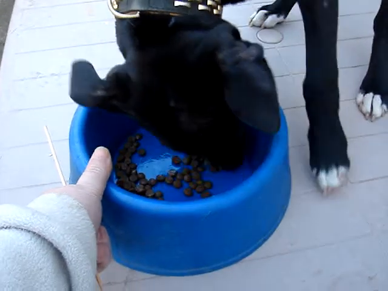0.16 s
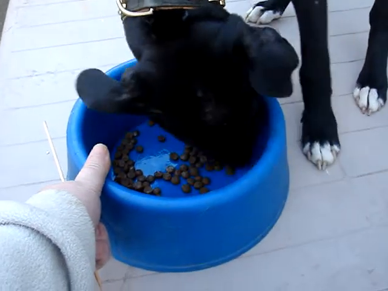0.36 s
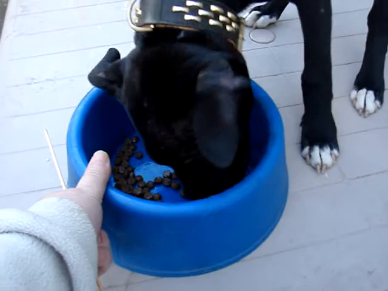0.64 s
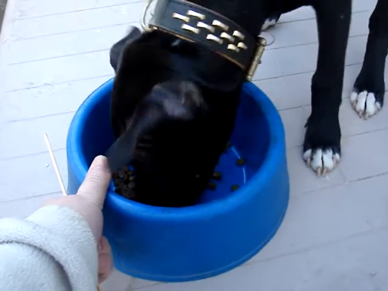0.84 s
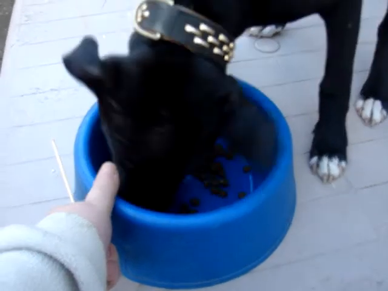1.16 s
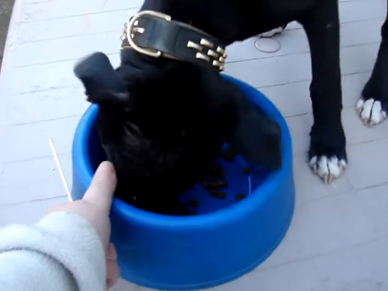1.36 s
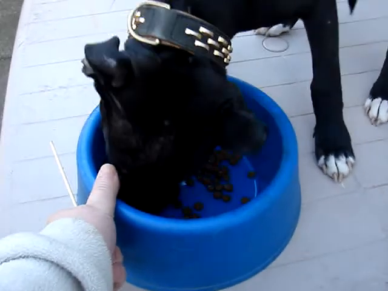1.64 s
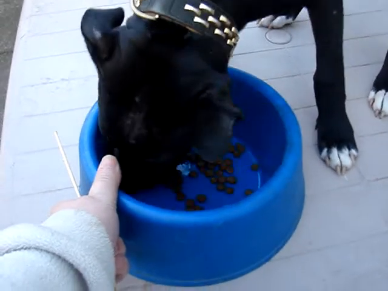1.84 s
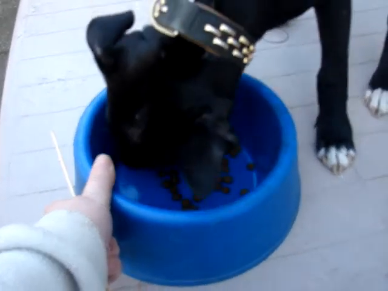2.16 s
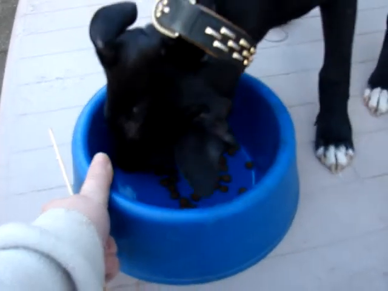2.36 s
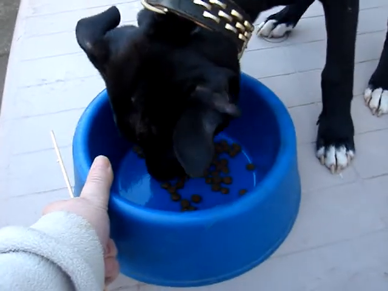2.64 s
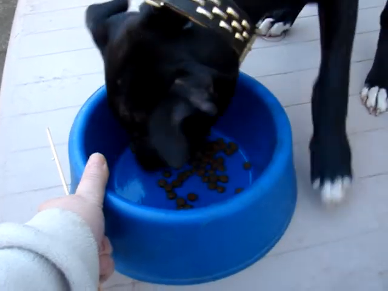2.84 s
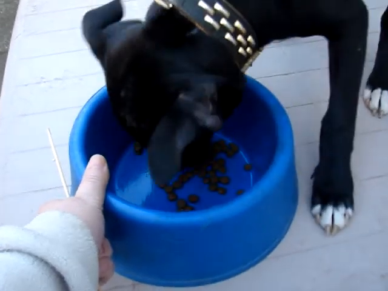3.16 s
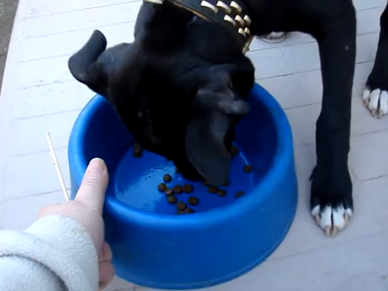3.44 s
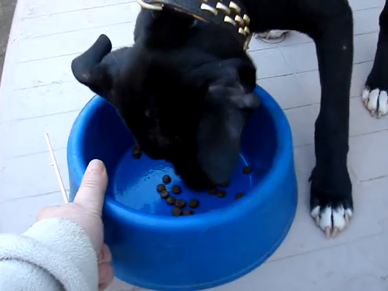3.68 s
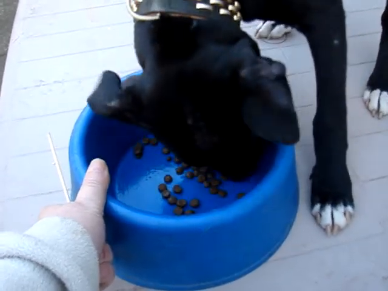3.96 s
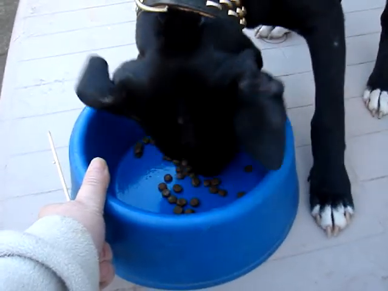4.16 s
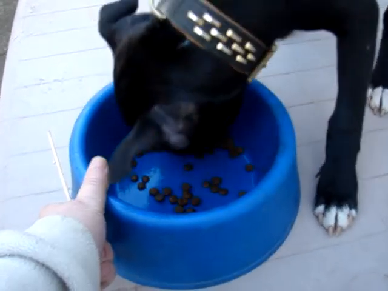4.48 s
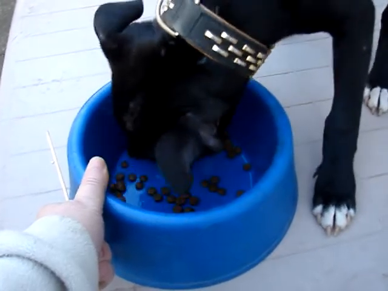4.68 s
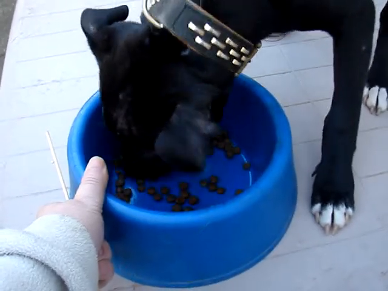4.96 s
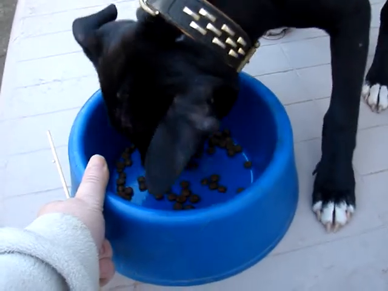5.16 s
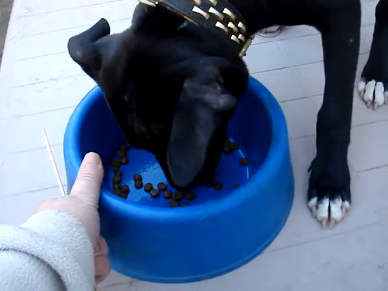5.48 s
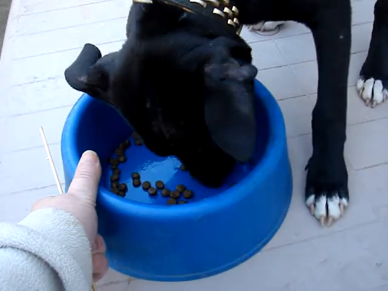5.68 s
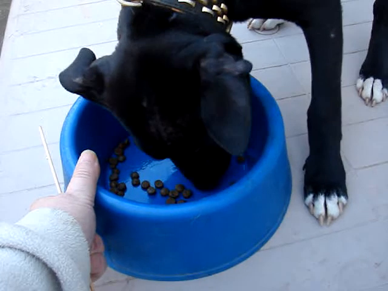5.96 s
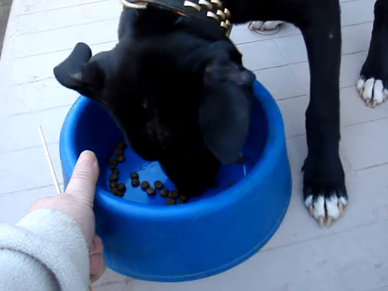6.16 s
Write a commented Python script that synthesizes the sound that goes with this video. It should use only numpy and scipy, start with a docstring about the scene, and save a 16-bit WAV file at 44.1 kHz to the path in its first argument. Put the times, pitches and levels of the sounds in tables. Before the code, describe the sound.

A large dog noses dry kibble around a plastic bowl up close, pellets rattling and cracking, the bowl thudding and dragging on boards.

```python
"""Large dog eating kibble

A large dog eats dry kibble, close by, from a plastic bowl on a board floor. Pellets crack, tick and rattle
as filtered impulses with short noise echoes and notes; crumbs grind and wet ticks cluster as lips part.
Teeth ring the hollow bowl's damped modes; the bowl thuds (brief cosine swings) and drags on the boards
(random slips through resonances). Faint reflections and quiet background noise surround it all."""
import sys
import numpy as np
from scipy import signal
from scipy.fft import rfft, irfft
from scipy.io import wavfile
from scipy.ndimage import uniform_filter1d

SR = 44100
rng = np.random.default_rng(int(sys.argv[2]) if len(sys.argv) > 2 else 0)


def put_to_file(sound):
    """Save the sound as 16-bit audio at rate SR, in the file named by the first command-line argument."""
    columns = np.atleast_2d(sound).T  # one column per channel
    safe = np.clip(columns, -1, 1)
    whole_steps = np.round(safe * 32767)
    wavfile.write(sys.argv[1], SR, whole_steps.astype(np.int16))


N = 278623
EDGE_HZ = 10100  # upper band limit

# colour of a pellet on plastic: f/Hz, level/dB
PELLET_SPECTRUM = [(60, -53), (250, -6), (480, -7), (700, 0.5), (950, -8.5), (1300, -6.5), (1780, -2),
                   (2220, -5.5), (2700, -2.5), (3500, -5), (4400, -6.5), (5300, -13.5), (7800, -21),
                   (10000, -36)]


def amp(db):
    """Decibels to gain."""
    return 10 ** (np.asarray(db) / 20)


def unit(x):
    """Scales a sound to rms 1."""
    return x / np.sqrt(np.mean(x ** 2) + 1e-20)


def curve(rows):
    """Level curve (t/s, level/dB) as a gain per sample."""
    return amp(np.interp(np.arange(N) / SR, *np.transpose(rows)))


def add(mix, start_s, sound):
    """Mixes a sound in at start_s."""
    part = mix[max(round(start_s * SR), 0):][:len(sound)]
    part += sound[:len(part)]


def colour(x, points, tilt_db=0, size=2048):
    """Minimum-phase filter with the given spectrum, its treble tilted by tilt_db per octave about 3 kHz."""
    hz = np.fft.rfftfreq(size, 1 / SR)
    point_hz, point_db = np.transpose(points)
    db = np.interp(np.log(hz + 1), np.log(point_hz), point_db)
    db = db + tilt_db * np.log2(np.clip(hz, 1200, EDGE_HZ) / 3000)
    # folding the cepstrum makes the response causal
    cepstrum = irfft(np.log(amp(db)))
    cepstrum[1:size // 2] *= 2
    cepstrum[size // 2 + 1:] = 0
    response = irfft(np.exp(rfft(cepstrum)))
    return signal.fftconvolve(x, response)[:len(x)]


def resonate(x, hz, width_hz):
    """A resonance of gain 1 at its centre."""
    return signal.lfilter(*signal.iirpeak(hz, hz / width_hz, fs=SR), x)


def glide(x, hz, width_hz):
    """A resonance that follows the curve hz: shift it to 0 Hz, low-pass, shift back."""
    turn = np.exp(2j * np.pi * np.cumsum(hz) / SR)
    r = np.exp(-np.pi * width_hz / SR)
    return 2 * (turn * signal.lfilter([1 - r], [1, -r], x / turn)).real


def shifting(x):
    """Random gain patches over time and frequency, so that resonances come and go."""
    z = signal.stft(x, nperseg=256)[2]
    patches = uniform_filter1d(rng.standard_normal(z.shape), size=3, axis=0)
    patches = uniform_filter1d(patches, size=12, axis=1)
    z = z * amp(2.4 * unit(patches))
    return signal.istft(z, nperseg=256)[1][:N]


def clumps(depth_db, size):
    """Bunching: a random gain that wanders over about size samples."""
    wander = uniform_filter1d(uniform_filter1d(rng.standard_normal(N), size), size)
    return amp(depth_db * unit(wander))


def steadied(x, size):
    """Evens out the power over size samples, so that only the quick texture is left."""
    return x / np.sqrt(uniform_filter1d(x ** 2, size) + .004 * np.mean(x ** 2))


def pushes(rows, attack_s, t60_s):
    """Gain of a series of pushes: each rises, holds for its length and dies away; their powers add."""
    t, power = np.arange(N) / SR, np.zeros(N)
    for start_s, length_s, db, *_ in rows:
        rise = np.clip((t - start_s) / attack_s, 0, 1)
        fall_db = -60 * np.clip((t - start_s - length_s) / t60_s, 0, 2)
        power += (rise * amp(db + fall_db)) ** 2
    return np.sqrt(power)


def pellet(points, tilt_db, scatter_db, scatter_t60_s, ring_db, ring_t60_s, note_db,
           low_hz=1600, high_hz=3900, width_hz=300, size=2048):
    """One hard contact: a snap, quick echoes between the bowl's walls, and a short ring of the plastic."""
    t = np.arange(size) / SR
    echoes, ring = rng.standard_normal((2, size))
    echoes *= amp(-60 * t / scatter_t60_s) * (1 - np.exp(-t / 0.00029))
    ring *= amp(-60 * t / ring_t60_s)
    hit = amp(scatter_db) * echoes / np.linalg.norm(echoes)
    hit += amp(ring_db) * ring / np.linalg.norm(ring)
    hit[0] += 1  # snap
    # every spot of the bowl favours two notes of its own
    notes_hz = low_hz * (high_hz / low_hz) ** rng.random(2)
    hit = hit + amp(note_db) * sum(resonate(hit, hz, width_hz) for hz in notes_hz)
    return colour(hit, points, tilt_db)


def background(level_db=-46):
    """Steady coloured noise whose spectrum shimmers in small patches."""
    # relative density: f/Hz, level/dB
    spectrum = [(20, 11.5), (100, -5), (300, 2), (700, -1), (1200, 1), (4300, -24), (10000, -25.5)]
    return amp(level_db) * unit(shifting(colour(rng.standard_normal(N), spectrum)))


def contacts(per_s=1100, spread_db=5.5, count=32):
    """Many small contacts of pellets rolling over each other, in bunches, at a steady power."""
    sizes = amp(spread_db * np.minimum(rng.exponential(1, N), 3)) * (rng.random(N) < per_s / SR)
    sizes *= rng.choice([-1, 1], N) * clumps(3, size=120)
    kind, grains = rng.integers(0, count, N), np.zeros(N)
    for k, tilt_db in enumerate(np.linspace(-7, 4, count)):
        grain = pellet(PELLET_SPECTRUM, tilt_db, scatter_db=0, scatter_t60_s=.008,
                       ring_db=-11, ring_t60_s=.022, note_db=-4)
        grains += signal.oaconvolve(sizes * (kind == k), unit(grain))[:N]
    return steadied(shifting(grains), size=650)


def munching(grains, level_db=-2, lumpy_db=4, mouth_hz=2300, wander_db=5.5, mouth_db=2,
             width_hz=350, tilt_db=-1):
    """Moist crumbs grind softly among ticking pellets; the mouth's resonance wanders as the jaw works."""
    # light rustle, before level_db: t/s, level/dB
    rustle = [(0, -43), (.35, -40.5), (.8, -37.5), (1.5, -37.5), (2.1, -38.5), (2.22, -42), (2.45, -36),
              (2.78, -47.5), (2.95, -38), (3.35, -46.5), (3.8, -49.5), (4, -37), (4.7, -31.5), (4.88, -37),
              (5.55, -41.5), (6.32, -44.5)]
    grind = colour(rng.standard_normal(N) * clumps(lumpy_db, size=160), PELLET_SPECTRUM, tilt_db)
    grind = unit(grind) + unit(grains)
    resonance_hz = mouth_hz * clumps(wander_db, size=3000)
    grind = grind + amp(mouth_db) * glide(grind, resonance_hz, width_hz)
    return amp(level_db) * steadied(shifting(grind), size=1200) * curve(rustle)


def drag(slips_per_s=600, lumpy_db=3, width_hz=110, rumble_db=-2, rumble_per_octave_db=-3,
         creep_db=-50, attack_s=0.0055, stop_t60_s=0.071):
    """The bowl's rim sticks and slips on the boards: each shove judders at its own pitch over a low rumble."""
    # the muzzle shoves the bowl: start t/s, length/s, level/dB, judder f/Hz
    shoves = [(0.197, 0.056, -34, 166), (0.334, 0.043, -37, 222), (0.605, 0.12, -33, 133),
              (0.824, 0.071, -37.5, 303), (1.003, 0.023, -35, 203), (1.198, 0.083, -32, 174),
              (1.35, 0.098, -25, 240), (1.471, 0.11, -32.5, 318), (1.65, 0.075, -35, 183),
              (1.861, 0.047, -26.5, 345), (1.949, 0.099, -33, 110), (2.091, 0.027, -33, 100),
              (2.279, 0.06, -29.5, 169), (2.36, .06, -32.5, 145), (2.48, 0.11, -46, 127),
              (2.688, 0.06, -37.5, 159), (2.806, 0.083, -32.5, 156), (2.941, .13, -31.5, 129),
              (3.298, 0.041, -25, 192), (3.375, 0.11, -34.5, 169), (3.492, .067, -32, 157),
              (3.917, 0.11, -38, 155), (4.283, .11, -41, 199), (4.491, 0.059, -37.5, 161),
              (4.744, 0.033, -25.5, 173), (4.876, 0.14, -34, 101), (5.059, 0.018, -24, 100),
              (5.14, 0.048, -26.5, 127), (5.222, 0.034, -35.5, 89.5), (5.34, 0.021, -35.5, 133),
              (5.734, 0.074, -38.5, 335.5), (5.999, 0.13, -37.5, 300)]
    # colour of the rumble: f/Hz, level/dB
    spectrum = [(10, -35), (35, 3), (90, 8), (230, -0.5), (400, -5), (900, -30), (2000, -41)]
    slips = rng.standard_normal(N) * (rng.random(N) < slips_per_s / SR) * clumps(lumpy_db, size=500)
    rumble = steadied(colour(slips, spectrum, size=8192), size=1100)
    out = amp(creep_db) * rumble  # it barely creeps between shoves
    for start_s, length_s, db, hz in shoves:
        span = slice(max(int(start_s * SR), 0), int((start_s + length_s + stop_t60_s) * SR))
        judder = resonate(resonate(slips, hz, width_hz), hz, width_hz)
        judder = unit(judder[span])
        judder = judder + amp(rumble_db + rumble_per_octave_db * np.log2(hz / 170)) * rumble[span]
        gain = pushes([(start_s, length_s, db)], attack_s, stop_t60_s)
        out[span] += steadied(judder, size=1100) * gain[span]
    return out


def rattle(grains, level_db=-2, note_db=-1, width_hz=350, treble_db=0.6, treble_per_octave_db=1.5,
           attack_s=0.0019, settle_t60_s=0.13):
    """Each muzzle sweep sets pellets rattling, coloured by the gap around it; then they roll to rest."""
    # sweeps, before level_db: start t/s, length/s, level/dB, gap resonance f/Hz
    sweeps = [(0.048, 0.046, -32, 1900), (.255, 0.0082, -35, 1850), (0.423, 0.022, -33, 1980),
              (0.566, 0.067, -29, 1740), (0.711, 0.039, -31.5, 2670), (0.789, 0.031, -34.5, 1300),
              (0.895, 0.052, -24.5, 1790), (0.995, 0.046, -30, 1890), (1.172, .02, -33, 1890),
              (1.229, .04, -23, 2130), (1.307, 0.032, -25.5, 1900), (1.424, 0.028, -24.5, 1990),
              (1.467, 0.054, -21.5, 2680), (1.543, 0.021, -22.5, 2500), (1.651, 0.063, -32.5, 1850),
              (1.779, 0.057, -29, 1940), (1.917, 0.066, -33, 2630), (2.037, 0.11, -34, 2050),
              (2.26, 0.012, -30, 2090), (2.637, .05, -34.5, 1850), (3.93, 0.078, -42, 2880),
              (4.006, 0.024, -31, 1850), (4.18, 0.022, -30, 2480), (4.295, 0.05, -28, 2700),
              (4.39, 0.054, -27.5, 2650), (4.516, 0.02, -26.5, 1760), (4.547, .06, -25, 2800),
              (4.656, 0.086, -27, 1760), (4.784, .03, -32.5, 1940), (4.927, 0.038, -27, 2870),
              (5.016, 0.028, -22.5, 1630), (5.53, .11, -36.5, 2500), (6.028, .11, -36.5, 1780)]
    out = np.zeros(N)
    for start_s, length_s, db, hz in sweeps:
        span = slice(max(int(start_s * SR), 0), int((start_s + length_s + settle_t60_s) * SR))
        # a narrower gap rings higher and lets more treble through
        tilt_db = treble_db + treble_per_octave_db * np.log2(hz / 2000)
        heap = colour(grains[span], [(1, 0), (EDGE_HZ, 0)], tilt_db)
        heap = unit(heap + amp(note_db) * resonate(heap, hz, width_hz))
        gain = pushes([(start_s, length_s, db + level_db)], attack_s, settle_t60_s)
        out[span] += heap * gain[span]
    return out


def clicks(level_db=-9.0, rebound_db=-17, rebound_s=0.011, note_db=1, width_hz=420, size=176):
    """Single loud pellet cracks and strikes, short and dry, each with its note and a faint rebound."""
    # cracks and strikes, before level_db: t/s, level/dB, note f/Hz
    strikes = [(0.052, -17, 1780), (0.5778, -10.5, 1820), (0.6184, -14, 2070), (0.7069, -7, 3100),
               (0.8867, -16, 1740), (0.9068, -10.5, 1900), (0.9662, -18.5, 1710), (0.9963, -15, 2500),
               (1.1526, -15, 2650), (1.1875, -9, 1900), (1.236, -13.5, 2760), (1.2569, -14, 2180),
               (1.2724, -15, 2150), (1.3025, -2, 3460), (1.316, -11, 3070), (1.323, -6.5, 1830),
               (1.3324, -5.5, 1900), (1.3813, -13.5, 1690), (1.4597, -11.5, 2500), (1.4817, -13, 3600),
               (1.497, -8, 2670), (1.517, -6.5, 1790), (1.5518, -2.5, 2640), (1.5587, -12, 2090),
               (1.6223, -16.5, 1880), (1.6618, -8, 2500), (1.7045, -14, 2420), (1.8003, -12.5, 2750),
               (1.9296, -9, 2700), (2.319, -18, 1900), (2.6249, -16, 1950), (2.6647, -12.5, 1880),
               (2.6906, -12.5, 1890), (2.9906, -6.5, 1900), (3.014, -13, 2500), (3.0471, -9.5, 1950),
               (3.0926, -16.5, 2200), (3.419, -12, 2470), (3.73, -12.5, 3360), (3.8482, -11, 2520),
               (4.2351, -5.5, 2630), (4.4356, -16, 2570), (4.6463, -11, 1840), (4.6598, -5.5, 3270),
               (4.7099, -12, 2920), (4.794, -9.5, 2840), (4.8101, -11, 2530), (5.002, -10.5, 2600),
               (5.0386, -9, 1670), (5.6103, -16.5, 2740), (5.7463, -18, 1810), (5.8549, -15, 1770),
               (6.0092, -17.5, 3100)]
    # colour of a hard crack: f/Hz, level/dB
    spectrum = [(60, -26), (300, -21.5), (700, -4), (1250, -7.5), (1780, -3), (2250, -3.5), (2750, -2.5),
                (3700, -6), (4500, -8), (5500, -17), (7800, -23), (10000, -40.5)]
    out = np.zeros(N)
    for start_s, db, hz in strikes:
        tilt_db = np.clip(1 + 5 * np.log2(hz / 2300), -10, 10)  # higher notes are brighter
        for delay_s, drop_db in [(0, 0), (rebound_s * rng.uniform(0.35, 1), rebound_db)]:
            hit = pellet(spectrum, tilt_db, scatter_db=2, scatter_t60_s=0.032,
                         ring_db=-10, ring_t60_s=0.041, note_db=-14)
            hit = hit + amp(note_db) * resonate(hit, hz, width_hz)
            onset_rms = np.sqrt(np.mean(hit[:size] ** 2))
            add(out, start_s + delay_s, amp(db + level_db + drop_db) * hit / onset_rms)
    return out


def smacks(level_db=4.0, pops_per_s=170, note_db=8, width_hz=900):
    """Films of saliva snap one by one: small clusters of very bright ticks, each with its own note."""
    # lips and tongue part, before level_db: middle t/s, length/s, level/dB
    partings = [(0.178, 0.0043, -30.5), (2.064, 0.067, -41.5), (2.9, 0.048, -42.5), (3.266, 0.035, -42.5),
                (3.598, .019, -39), (3.932, .018, -40), (5.863, 0.0058, -32)]
    # colour of a wet smack: f/Hz, level/dB
    spectrum = [(200, -41), (1500, -15), (3200, -4.5), (4500, -4), (6500, -4.5), (8300, -8), (10000, -11.5)]
    out = np.zeros(N)
    for middle_s, length_s, db in partings:
        count = 1 + int(length_s * pops_per_s)
        for k, (slip, note) in enumerate(rng.random((count, 2))):
            tick = pellet(spectrum, 0, scatter_db=3.0, scatter_t60_s=0.015,
                          ring_db=-33, ring_t60_s=0.019, note_db=17.5)
            tick = tick + amp(note_db) * resonate(tick, 4500 + 4200 * note, width_hz)
            tick *= np.sqrt(length_s * SR / count) / np.linalg.norm(tick)
            start_s = middle_s + length_s * ((k + slip) / count - .5)
            add(out, start_s, amp(db + level_db) * tick)
    return out


def knocks(scrape_db=-12, scrape_t60_s=0.081, contact_s=0.00028, detune=0.052):
    """A tooth strikes and skids a little, ringing the bowl's damped modes at pitches that depend on the spot."""
    # teeth on the bowl: t/s, peak level/dB, nominal ring f/Hz
    strikes = [(.2205, -23.5, 570), (.8475, -22, 500), (.8988, -16.5, 475), (1.3665, -11.5, 723),
               (1.4029, -8, 680), (1.4112, -13.5, 760), (1.8809, -13.5, 667), (1.8935, -17, 804),
               (2.3925, -20, 620), (2.7528, -22, 720), (2.8958, -18.5, 736), (3.015, -6.5, 832),
               (3.0928, -14.5, 743), (3.3753, -25.5, 784), (3.4195, -5, 727), (3.5943, -24.5, 740),
               (3.696, -27.5, 680), (3.7302, -12, 660), (5.0436, -11, 750), (5.7014, -19, 706),
               (5.7471, -17.5, 610), (6.004, -21, 683)]
    # modes of the hollow bowl: nominal multiple of ring pitch [1], level/dB, t60/s
    modes = [(0.471, -21, 0.021), (0.881, -9.5, 0.044), (0.999, 2, 0.036), (1.12, -1.5, 0.014),
             (1.72, -9, 0.035)]
    t, out = np.arange(3000) / SR, np.zeros(N)
    for start_s, db, hz in strikes:
        skid = rng.standard_normal(len(t)) * amp(-60 * t / scrape_t60_s)
        force = amp(scrape_db) * skid / np.linalg.norm(skid) + (t == 0)
        spots = 1 + detune * rng.uniform(-1, 1, len(modes))
        ring = sum(amp(mode_db - 60 * t / t60_s) * np.cos(2 * np.pi * hz * ratio * spot * t)
                   for (ratio, mode_db, t60_s), spot in zip(modes, spots))
        clack = signal.fftconvolve(force, ring * (1 - np.exp(-t / contact_s)))
        add(out, start_s, amp(db) * clack / abs(clack).max())
    return out


def bump(db, hz, rise_cycles, fall_cycles, t):
    """One soft, heavily damped blow: the bowl swings for only a cycle or two."""
    turns = hz * t
    swell = 1 / np.cosh(turns / np.where(t < 0, rise_cycles, fall_cycles)) ** 2
    return amp(db) * swell * np.cos(2 * np.pi * (turns + rng.random()))


def bumps(rise_cycles=0.28, fall_cycles=0.42, rock_s=0.011, rock_db=-19):
    """The muzzle bumps the bowl: it thuds on the boards and rocks back once, more weakly."""
    # thuds: t/s, envelope peak level/dB, pitch f/Hz
    thuds = [(0.225, -15.5, 303), (0.403, -19.5, 244), (1.212, -15, 192), (1.3637, -17, 300),
             (1.379, -6.5, 250), (1.4, 3, 260), (1.429, -5, 286), (1.441, -5, 233), (1.881, -10, 346),
             (1.886, -3, 348), (1.892, -11.5, 288), (1.999, -16.5, 216), (2.098, -21, 257),
             (2.327, -21, 240), (2.393, -20, 250), (2.732, -15.5, 175), (2.877, -14.5, 144),
             (3.392, -12, 166), (3.404, -6.5, 238), (3.452, -11.5, 158), (3.529, -10, 175),
             (4.292, -19.5, 255), (4.767, -10.5, 285), (4.889, -16, 236), (5.16, -12.5, 139),
             (5.239, -17.5, 111), (5.457, -20.5, 190), (5.653, -12, 144), (5.749, -22.5, 340)]
    t, out = np.arange(-900, 1800) / SR, np.zeros(N)
    for peak_s, db, hz in thuds:
        for delay_s, drop_db in [(0, 0), (rock_s, rock_db)]:
            blow = bump(db + drop_db, hz, rise_cycles, fall_cycles, t)
            add(out, peak_s + delay_s + t[0], blow)
    return out


def stroke(length_s, per_s, size=1024):
    """A swell of tiny uneven slips, followed by silence for them to ring in."""
    n = max(int(length_s * SR), 64)
    slips = rng.standard_normal(n) * (0.029 + (rng.random(n) < per_s / SR))
    return np.pad(slips * np.hanning(n), (0, size)), n


def scuffs(slips_per_s=1500, width_hz=260, upper=1.53, upper_db=-8):
    """Rubbing, a swell of tiny uneven slips, sounds the air pocket between muzzle and bowl."""
    # the muzzle rubs the bowl's hollow: middle t/s, length/s, level/dB, resonance f/Hz
    rubs = [(.858, 0.059, -39, 490), (1.241, .045, -34.5, 606), (1.368, 0.02, -32.5, 657),
            (1.489, .081, -27, 606), (1.892, .035, -41, 630), (4.044, .034, -33.5, 440),
            (4.417, 0.12, -37, 1150), (4.722, 0.11, -34.5, 1040)]
    out = np.zeros(N)
    for middle_s, length_s, db, hz in rubs:
        slips, n = stroke(length_s, slips_per_s)
        rub = resonate(slips, hz, width_hz)
        rub = rub + amp(upper_db) * resonate(slips, hz * upper, 2 * width_hz)
        add(out, middle_s - length_s / 2, amp(db) * rub * np.sqrt(n) / np.linalg.norm(rub))
    return out


def room(x, wet_db, t60_s):
    """Faint reflections from the floor and nearby walls: a decaying noise tail after 5 ms."""
    t = np.arange(SR // 3) / SR
    tail = rng.standard_normal(len(t)) * amp(-60 * t / t60_s) * (t > .005)
    return x + amp(wet_db) * signal.fftconvolve(x, tail / np.linalg.norm(tail))[:N]


def scene():
    """The mouth, the bowl and its pellets over a quiet background."""
    air = background()
    grains = contacts()
    # munching reuses the grains 1 s later, so its ticks do not coincide with the rattle's
    eating = munching(np.roll(grains, SR)) + drag() + rattle(grains) + clicks()
    eating += smacks() + knocks() + bumps() + scuffs()
    return (room(eating, wet_db=-27.0, t60_s=0.24) + air)[None]


def record(dry):
    """The microphone rounds off the sharpest peaks; then the band limit."""
    rounded = dry / (1 + (dry / .7) ** 4) ** (1 / 4)
    low_pass = signal.firwin(401, EDGE_HZ, window=("kaiser", 8), fs=SR)
    return signal.oaconvolve(rounded, low_pass[None], "same")


dry = scene()
out = record(dry)
put_to_file(out)
```